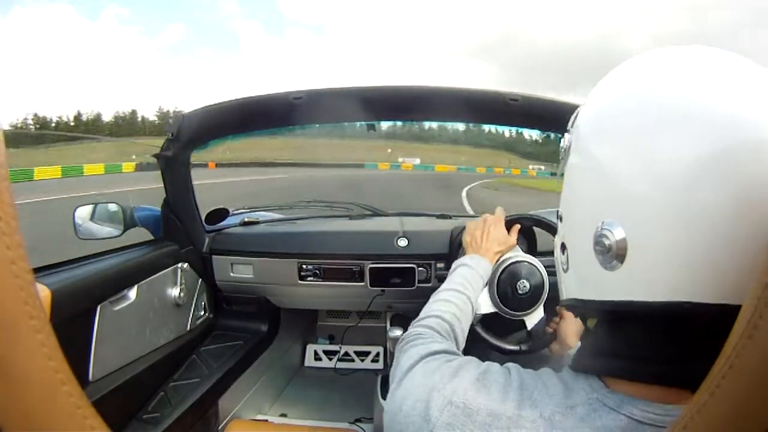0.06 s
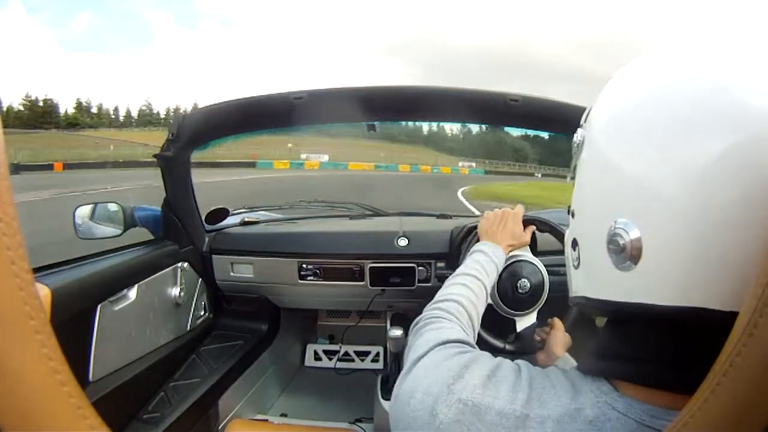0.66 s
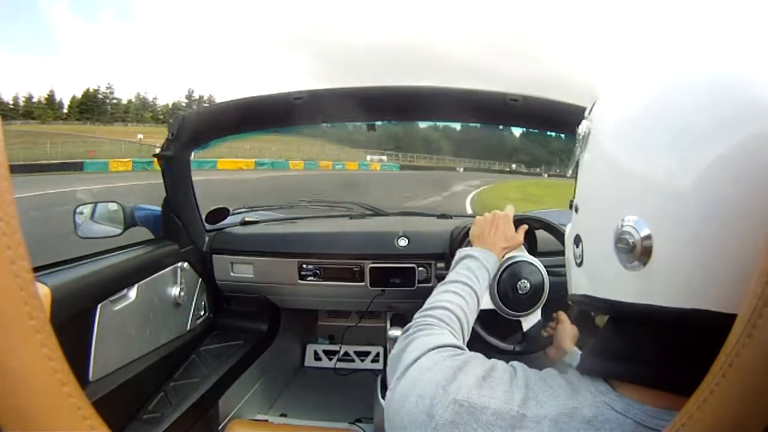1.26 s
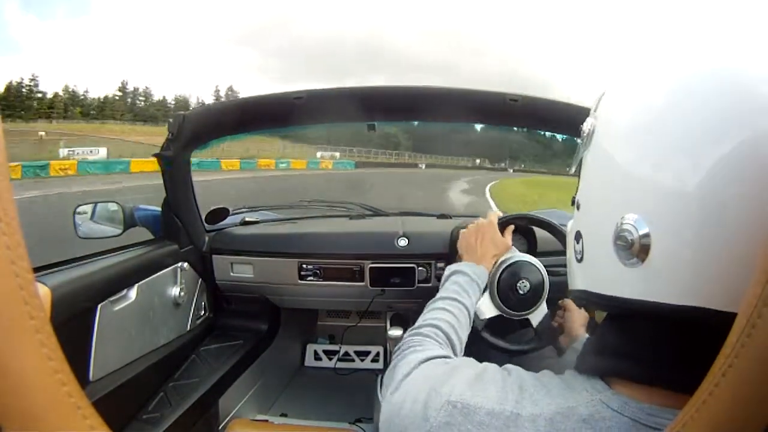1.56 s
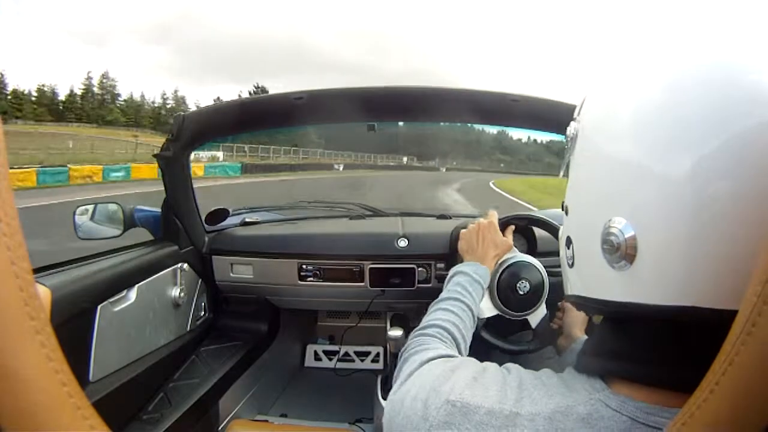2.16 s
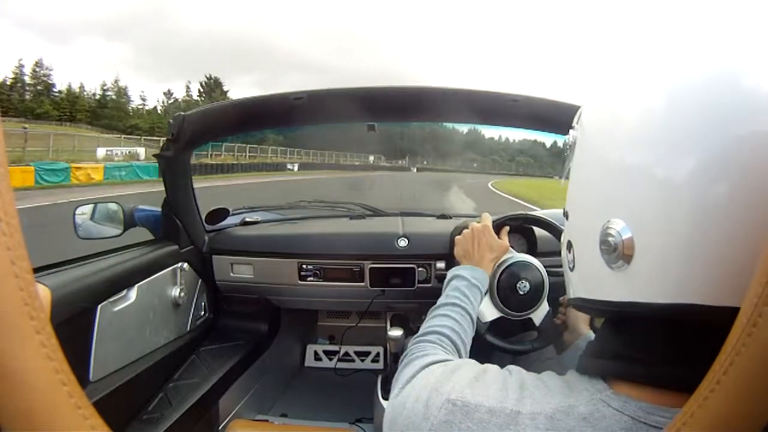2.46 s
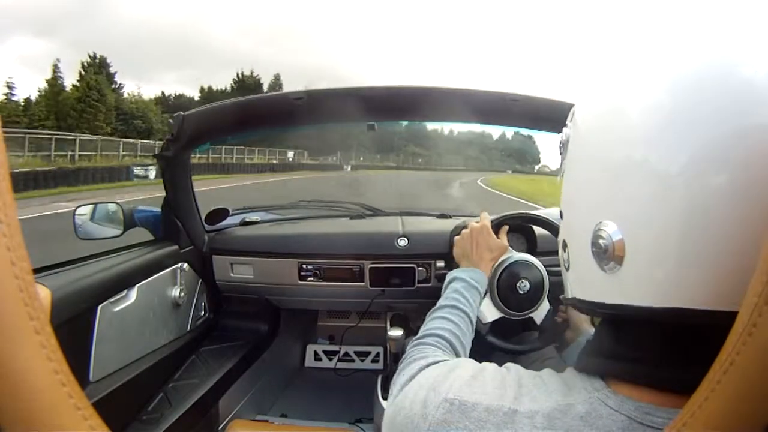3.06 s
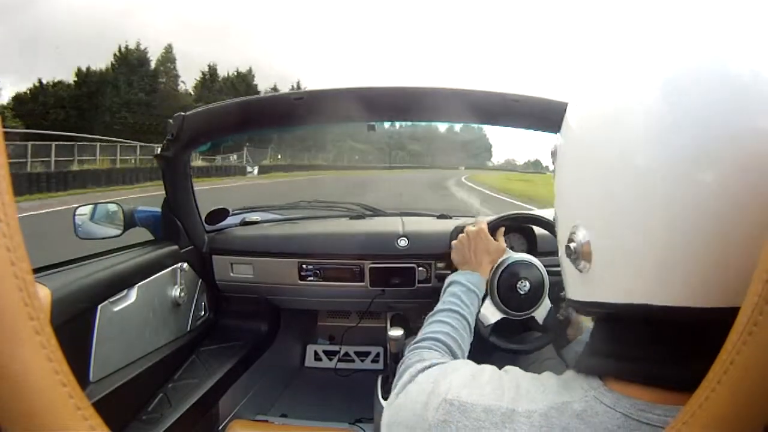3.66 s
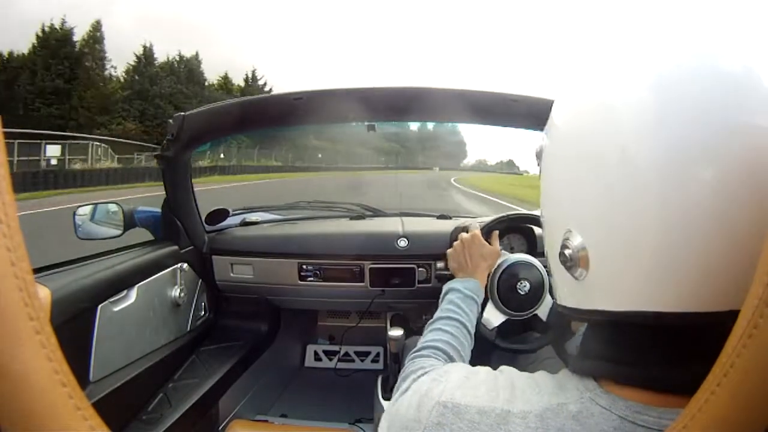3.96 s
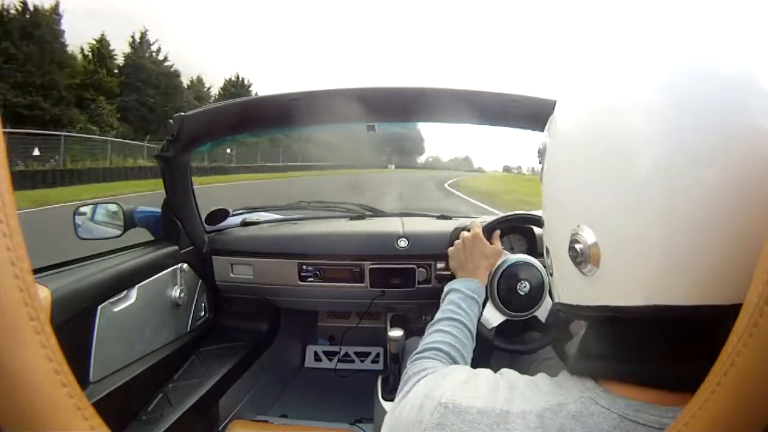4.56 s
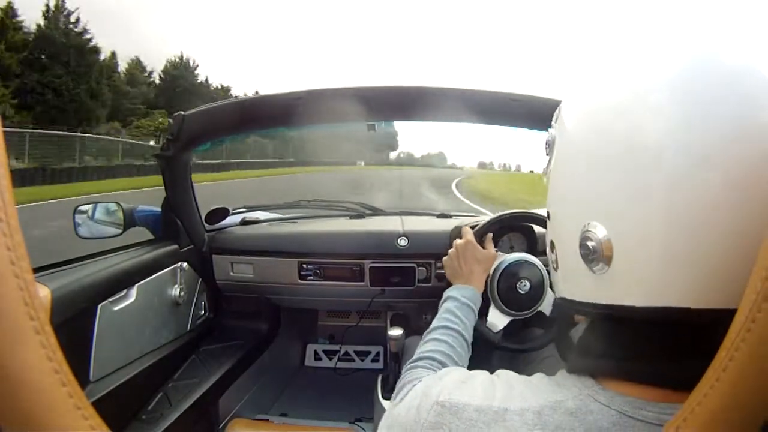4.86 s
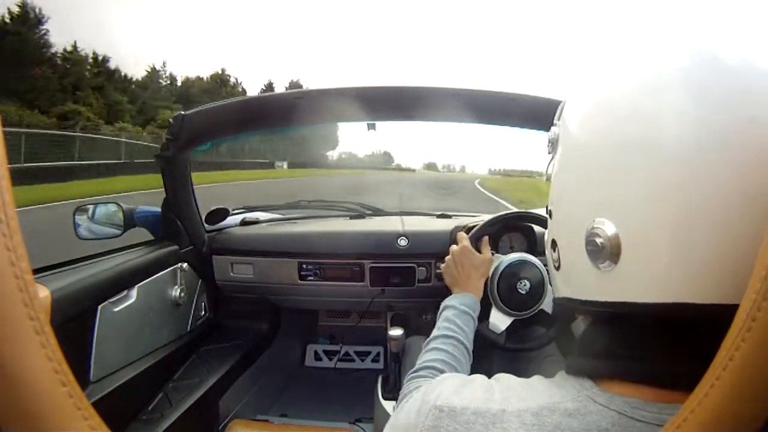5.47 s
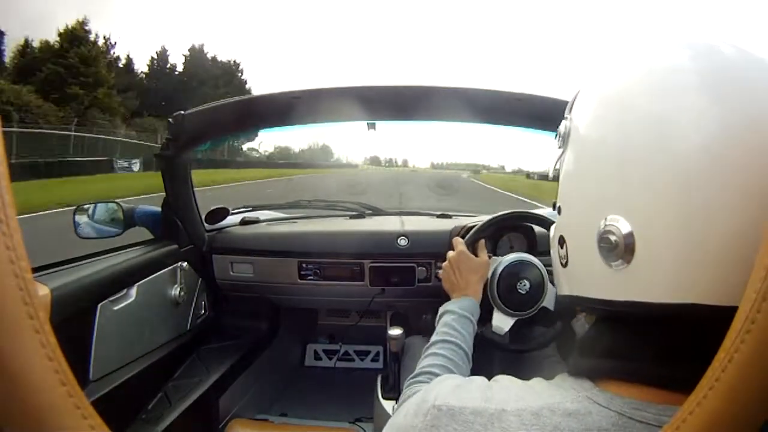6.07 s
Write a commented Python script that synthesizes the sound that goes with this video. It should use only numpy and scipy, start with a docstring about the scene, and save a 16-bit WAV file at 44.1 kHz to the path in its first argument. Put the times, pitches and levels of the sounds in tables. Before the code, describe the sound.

An open sports car pulls out of a bend on a race track, heard from a small camera between the seats. Tyres chirp briefly over road roar and wind slapping the microphone. The four-cylinder engine climbs, booming in the cockpit, rasping and briefly howling. Then the throttle lifts, a whine rises with faint gear noise, and the buffeting returns, with a few light ticks of loose trim.

```python
"""An open sports car pulls hard out of a bend, heard from between the seats. For two seconds the tyres
chirp over road roar and wind slapping the microphone. The four-cylinder engine climbs and booms in the
cockpit, lopes and rasps around 3 s, then briefly howls. At 4.8 s the driver lifts off: the gears sing,
a whine rises and the buffeting returns. Loose trim ticks now and then. A small action camera hears it
all through a fast limiter and a coarse sample clock."""
import sys
import numpy as np
from scipy import signal
from scipy.fft import rfft, irfft, next_fast_len
from scipy.io import wavfile
from scipy.ndimage import uniform_filter1d, map_coordinates

SR = 44100
rng = np.random.default_rng(int(sys.argv[2]) if len(sys.argv) > 2 else 0)


def put_to_file(sound):
    """Save the sound as 16-bit audio at rate SR, in the file named by the first command-line argument."""
    columns = np.atleast_2d(sound).T  # one column per channel
    safe = np.clip(columns, -1, 1)
    whole_steps = np.round(safe * 32767)
    wavfile.write(sys.argv[1], SR, whole_steps.astype(np.int16))


N = 278271
TIME = np.arange(N) / SR


def engine():
    """One crankshaft drives every layer; lope and rasp each bloom in a narrow band of its speed."""
    # crankshaft speed (time [s], speed [turns/s])
    shaft = [(0, 58), (0.2, 58.1), (0.55, 61.3), (1.1, 61), (1.95, 67), (2.35, 67), (2.83, 70.4),
             (4.1, 77.4), (4.72, 82.7), (5.33, 78), (6.31, 78.2)]
    # eased through the bend, full on the way out, then the lift (time [s], level re full load [dB])
    throttle = [(0, -1.5), (0.53, -1), (0.62, -4.5), (1.05, -6.5), (1.4, -11), (1.85, -5.5), (2.0, -3),
                (2.35, -1), (4.74, 0.5), (4.85, -11.5), (6.31, -12.5)]
    speed, load_db = curve(shaft), curve(throttle)
    turns = np.cumsum(speed) / SR
    bloom = lambda centre_hz, half_width_hz: amp(load_db) / np.hypot(1, (speed - centre_hz) / half_width_hz)
    body = boom(speed, turns, load_db)
    edge = amp(-25.5) * bloom(70.3, 3) * lope(turns)
    edge += amp(-38) * bloom(71.1, 3.2) * rasp(turns)
    return body + edge + gears(turns)


def boom(speed, turns, load_db, howl_db=6.5):
    """Two firings a turn give the even orders, which swell in the cockpit; the top two jump to a howl."""
    firing = amp(load_db) * cockpit(2 * speed) * tone(2 * turns, flutter_db=0.5, drift=0.08, rate=22)
    overtone = lambda k: cockpit(k * speed) * tone(k * turns, flutter_db=1.46, drift=0.16, rate=26)
    howl = amp(howl_db * (ramp(3.03, 0.13) - ramp(3.7, 0.11)))
    brightness = amp(1.86 * load_db)  # overtones grow faster with load than the firing tone
    return firing + brightness * (overtone(4) + howl * (overtone(6) + overtone(8)))


def cockpit(hz):
    """Gain of the cockpit, which booms as an engine order sweeps through a resonance."""
    # cockpit resonances (frequency [Hz], width [Hz], level [dB])
    modes = [(121.3, 18.7, -17), (135, 14, -25), (159.6, 18.1, -16), (230.1, 16, -15.5), (271.7, 46, -23),
             (365, 2.9, -28), (401.5, 23, -23), (445.4, 43, -31), (596, 50, -29.3)]
    return sum(amp(db) / (1 + (2 * (hz - centre) / width) ** 2) for centre, width, db in modes)


def lope(turns):
    """Unequal cylinders fill in the orders between the even ones; each stroke differs a little."""
    # low tones of the uneven exhaust (shaft order [cycles/turn], relative level [dB])
    orders = [(2.5, -0.5), (3, 1.5), (3.5, -19.5), (4.5, -26.5), (5, -9), (5.5, -17), (6.5, -9), (7, -12.5),
              (7.5, -11)]
    return sum(amp(db) * tone(k * turns, flutter_db=0.2, drift=0.14, rate=18) for k, db in orders)


def rasp(turns, roughness=0.5):
    """Each firing is a blow and a puff of noise; high orders flare in the engine bay's resonances."""
    # each cylinder's blow, in firing order (strength [gain])
    cylinders = [0.99, 0.53, 0.6, 0.12]
    # engine-bay resonances (frequency [Hz], width [Hz], relative level [dB])
    modes = [(817, 7.4, 14.5), (923.5, 27, 9), (1157, 30, -4), (1707, 60, -10), (2448, 62, 0),
             (2766, 110, -6), (3655, 39, -1)]
    firings = np.arange(1, int(2 * turns[-1]))
    at = np.interp(firings, 2 * turns, np.arange(N))
    size = np.resize(cylinders, len(at)) * amp(rng.standard_normal(len(at)))
    whole, part = at.astype(int), at % 1  # each blow is shared between two samples
    blows = np.bincount(whole, size * (1 - part), N + 1) + np.bincount(whole + 1, size * part, N + 1)
    puffs = rng.standard_normal(N) * amp(2.9 * np.cos(4 * np.pi * turns))
    pulses = unit(blows[:N]) + roughness * unit(puffs)
    bay = lambda f: sum(amp(db) * 1j * f * w / (c * c - f * f + 1j * f * w) for c, w, db in modes)
    bulkhead = lambda f: 1 / (1 + (f / 4400) ** 8)  # the wall behind the seats stops the highs
    return unit(filtered(pulses, lambda f: bay(f) * bulkhead(f)))


def gears(turns, lift_s=4.8):
    """Gear teeth sing once the throttle is closed."""
    # meshing tones (shaft order [cycles/turn], level [dB])
    orders = [(24, -59.5), (40, -59), (48, -58)]
    song = sum(amp(db) * tone(k * turns, flutter_db=2.5, drift=0.91, rate=31) for k, db in orders)
    return ramp(lift_s, 0.26) * song


def air():
    """Wind and road noise ride one fader; the same eddies shake the buffet, tyres and hiss."""
    # heard level of wind and road noise, ducking while the engine booms (time [s], relative level [dB])
    fader = [(0, -3), (0.42, -6), (0.7, -1), (0.98, 0), (1.25, -1.5), (1.37, -1.5), (1.55, -2.5),
             (1.75, 1.5), (2.08, 1.5), (2.2, 1), (3.3, -0.5), (4, -2.5), (4.3, -4.5), (4.74, -6.5),
             (4.95, 1), (5.6, 0.5), (5.9, -1), (6.31, -0.5)]
    bed_db, eddies = curve(fader), wobble(28)
    bass_db = 0.6 * bed_db  # the low layers duck more gently
    return rumble(bass_db) + buffet(bass_db, eddies) + tyres(bed_db, eddies) + hiss(bed_db, eddies)


def rumble(bass_db, rise_db_per_s=0.54):
    """Deep wind rumble with softened peaks, building as the car gathers speed."""
    # deep wind colour (frequency [Hz], relative level [dB])
    spectrum = [(8, -33), (20, -7.5), (28, -0.5), (42, 0.5), (70, -4), (100, -18), (200, -51.5),
                (500, -120)]
    # gusts that swell the rumble (centre time [s], length [s], boost [dB])
    gusts = [(0.79, 0.31, 3.5), (2.93, 0.27, 3.5), (3.55, 0.55, 2), (4.946, 0.3, 2), (6.204, 0.5, 3)]
    gust_db = sum(db * swell(s, length) for s, length, db in gusts)
    deep = signal.hilbert(noise(spectrum))
    softened = unit(deep.real / np.sqrt(1 + 1.2 * np.abs(deep) ** 2))
    return amp(-22.5 + bass_db + rise_db_per_s * TIME + gust_db) * softened


def buffet(bass_db, eddies, fade_s=0.13):
    """The airflow breaks up in spells and batters the microphone."""
    # buffeting colour (frequency [Hz], relative level [dB])
    spectrum = [(35, -30), (65, 0), (85, 3), (125, 0.5), (185, -7), (260, -17), (500, -59), (1000, -120)]
    # rougher and calmer spells (start [s], end [s], level change [dB])
    spells = [(0.62, 1.853, 6), (0.95, 1.452, 4.5), (2.646, 3.051, -2), (4.823, 6.5, 4)]
    step = lambda s: ramp(s - fade_s / 2, fade_s)
    spell_db = sum(db * (step(start) - step(end)) for start, end, db in spells)
    return amp(-27 + bass_db + spell_db + 0.87 * eddies) * noise(spectrum)


def slaps(width_s=0.0038):
    """Each big eddy is one dip of pressure between two softer rises."""
    # eddies hitting the microphone (time [s], level [dB])
    hits = [(0.351, -3.5), (0.839, -10.5), (1.057, -8.5), (1.172, -3.5), (1.422, -3), (1.855, -4),
            (2.119, -8.5), (4.994, -5), (5.461, -5), (5.595, -6), (5.692, -4.5), (5.795, -2.5), (5.969, -5)]
    pressure = np.zeros(N)
    for s, db in hits:
        u = (TIME - s) / width_s
        pressure -= amp(db) * (1 - u * u) * np.exp(-u * u / 2)
    return pressure


def tyres(bed_db, eddies, rise_db_per_s=2):
    """The tyres roar on the asphalt; the tread's pitched rush builds as the car gathers speed."""
    # road roar colour (frequency [Hz], relative level [dB])
    road = [(100, -19.5), (200, 1.5), (300, -1), (390, 1.5), (460, 2), (525, -1), (585, 2), (660, -4),
            (720, -12.5), (900, -22.5), (1100, -28), (1500, -33.5), (3000, -70), (6000, -120)]
    # tread rush colour (frequency [Hz], relative level [dB])
    tread = [(400, -41.5), (620, -3), (730, 2.5), (830, -5.5), (1050, -24), (1600, -71)]
    roar = amp(-24 + bed_db + 0.88 * eddies) * noise(road)
    rush = amp(-51 + bed_db + rise_db_per_s * TIME + 1.2 * eddies) * noise(tread)
    return roar + rush


def chirps():
    """Brief wavering tones: tyre chirps and, first and last, an engine overtone flaring in a resonance."""
    # brief tones (centre time [s], length [s], pitch [Hz], level [dB], phase scatter [rad])
    notes = [(0.084, 0.17, 670, -30.5, 0.62), (1.032, 0.21, 593, -30, 1.1), (1.376, 0.17, 585, -26.5, 0.93),
             (1.41, 0.18, 474, -30, 1), (1.772, 0.314, 595, -24.5, 1.8), (2.066, 0.15, 923, -36.5, 0.46)]
    return sum(amp(db) * swell(s, length) * tone(hz * TIME, flutter_db=0.5, drift=scatter, rate=70)
               for s, length, hz, db, scatter in notes)


def whine(start_s=4.95, start_hz=330.4, rise_hz_per_s=54.5):
    """A single wavering tone rises steadily after the lift."""
    hz = start_hz + rise_hz_per_s * (TIME - start_s)
    return amp(-28) * ramp(start_s, 0.27) * tone(np.cumsum(hz) / SR, flutter_db=2.5, drift=0.55, rate=32)


def hiss(bed_db, eddies, rise_db_per_s=0.47):
    """Turbulence over the windscreen adds a flickering top end that builds slowly."""
    # airy colour (frequency [Hz], relative level [dB])
    spectrum = [(400, -19.5), (900, 5.5), (1400, -7), (1900, -0.5), (2700, 2), (3250, -4.5), (3750, 3),
                (4300, -5.5), (5000, -12.5), (5900, -18.5)]
    flicker_db = 0.96 * eddies + 1.1 * wobble(170)
    return amp(-46 + bed_db + rise_db_per_s * TIME + flicker_db) * noise(spectrum)


def ticks(t60=0.015):
    """Loose trim taps with a dry, bright click."""
    # trim taps (time [s], level [dB])
    taps = [(1.418, -42.5), (2.5536, -42), (5.5967, -36.5), (5.9702, -37)]
    # click colour (frequency [Hz], relative level [dB])
    spectrum = [(1200, -32), (2500, -5.5), (4200, -0.5), (5400, -1.5), (6000, -15.5)]
    envelope = sum(amp(db - 60 * np.abs(TIME - s) / t60) * (TIME >= s) for s, db in taps)
    return envelope * noise(spectrum)


def tone(turns, flutter_db, drift, rate):
    """A sine of rms about 1 whose level and phase (drift, in radians) waver in the moving air."""
    level = np.sqrt(2) * amp(flutter_db * wobble(rate))
    return level * np.sin(2 * np.pi * (turns + rng.random()) + drift * wobble(rate))


def noise(spectrum):
    """Noise of rms 1, coloured by rows of (frequency [Hz], level [dB])."""
    f, db = np.transpose(spectrum)
    colour = lambda hz: amp(np.interp(np.log(hz + 1), np.log(f), db))
    return unit(filtered(rng.standard_normal(N), colour))


def filtered(x, response):
    """Shape x with a frequency response."""
    m = next_fast_len(N + SR // 4)
    return irfft(rfft(x, m) * response(np.fft.rfftfreq(m, 1 / SR)), m)[..., :N]


def wobble(rate):
    """A smooth random curve, rate knots a second."""
    return map_coordinates(rng.standard_normal(int(N * rate / SR) + 4), [TIME * rate])


def curve(rows):
    """An automation line through (time [s], value) points."""
    return np.interp(TIME, *np.transpose(rows))


def ramp(start_s, length_s):
    """A straight rise from 0 to 1."""
    return np.clip((TIME - start_s) / length_s, 0, 1)


def swell(centre_s, length_s):
    """A rounded hump from 0 up to 1 and back."""
    return np.cos(np.pi * np.clip((TIME - centre_s) / length_s, -0.5, 0.5))


def amp(db):
    """Decibels to gain."""
    return 10 ** (np.asarray(db) / 20)


def unit(x):
    """Scale to rms 1."""
    return x / np.sqrt(np.mean(x ** 2) + 1e-20)


def scene():
    """Everything meets at the microphone; the two channels are almost alike."""
    # faint stereo-width noise (frequency [Hz], relative level [dB])
    spread = [(30, -10), (60, -3.5), (215, 0.5), (520, -24.5), (1200, -7.5), (2500, -22.5), (4270, -25.5),
              (6000, -23)]
    mono = engine() + air() + slaps() + chirps() + whine() + ticks()
    side = amp(-60.5) * noise(spread)
    return np.array([mono + side, mono - side])


def limiter(x, ceiling_db, release_db_per_s, sense_hz):
    """Loud bass pushes pull the gain down within milliseconds; it creeps back at a steady rate."""
    bass = filtered(x.mean(0), lambda hz: 1 / (1 + (hz / sense_hz) ** 2))
    power = np.abs(uniform_filter1d(bass ** 2, size=260))
    over_db = np.maximum(10 * np.log10(power + 1e-12) - ceiling_db, 0)
    recovery = release_db_per_s * TIME
    cut_db = np.maximum.accumulate(over_db + recovery) - recovery
    return x * amp(-uniform_filter1d(cut_db, size=130))


def record(dry, clock_hz=12000, top_hz=15300):
    """The camera limits, samples coarsely and holds each sample, mirroring the sound around its clock."""
    limited = limiter(dry, ceiling_db=-11.5, release_db_per_s=52.5, sense_hz=284)
    fade = np.minimum(1, np.minimum(TIME, TIME[::-1]) / 0.004)
    coarse = signal.resample_poly(limited * fade, clock_hz, SR, axis=1)
    held = signal.resample_poly(np.repeat(coarse, 4, axis=1), SR, 4 * clock_hz, axis=1)[:, :N]
    return filtered(held, lambda hz: hz < top_hz)


dry = scene()
out = record(dry)
put_to_file(out)
```